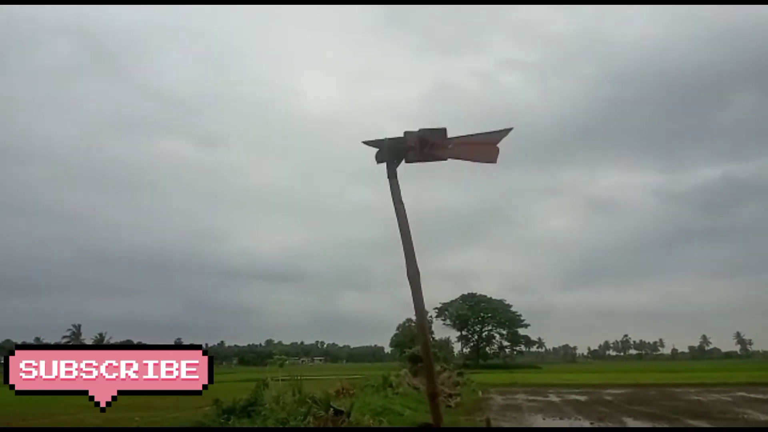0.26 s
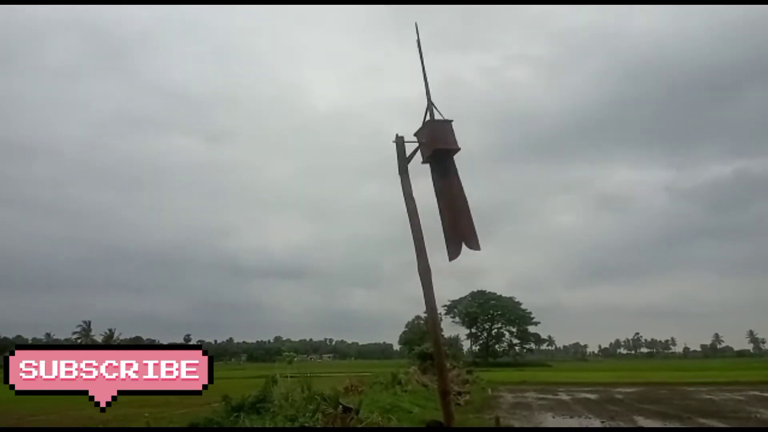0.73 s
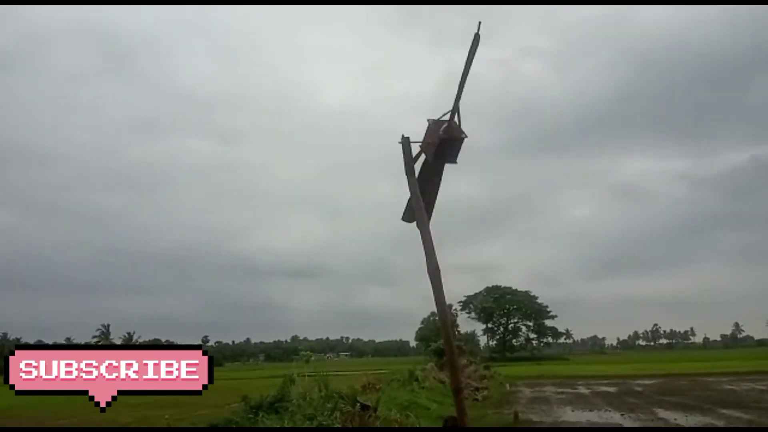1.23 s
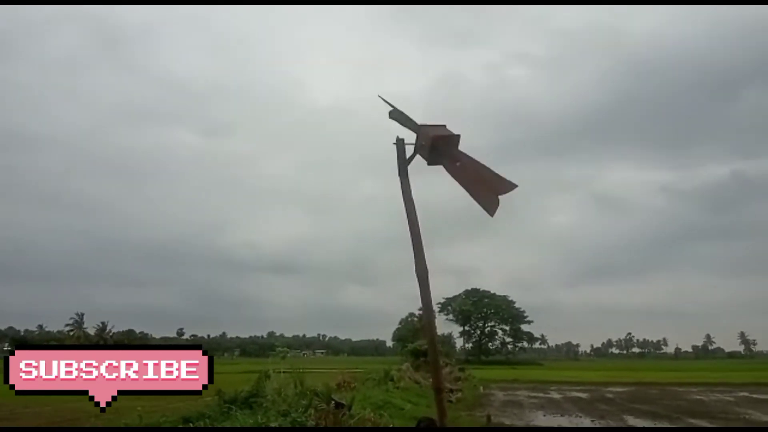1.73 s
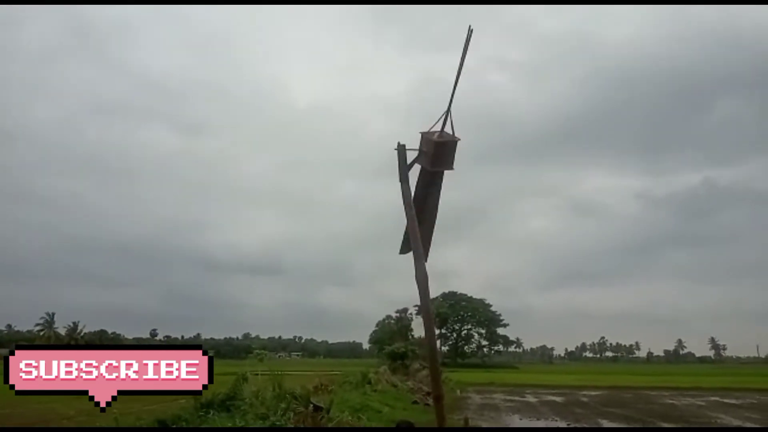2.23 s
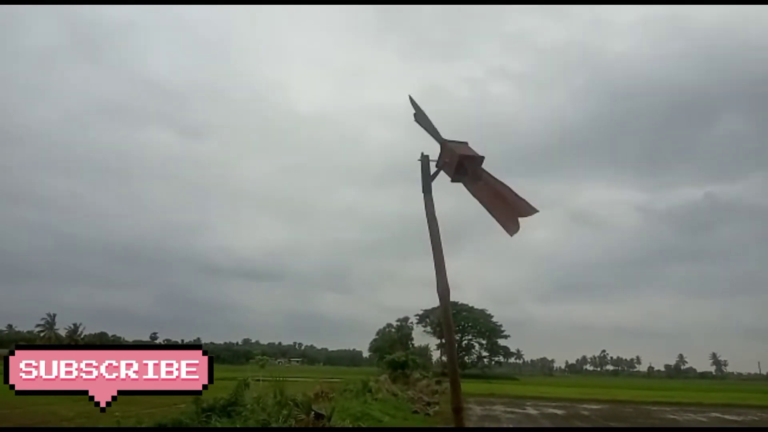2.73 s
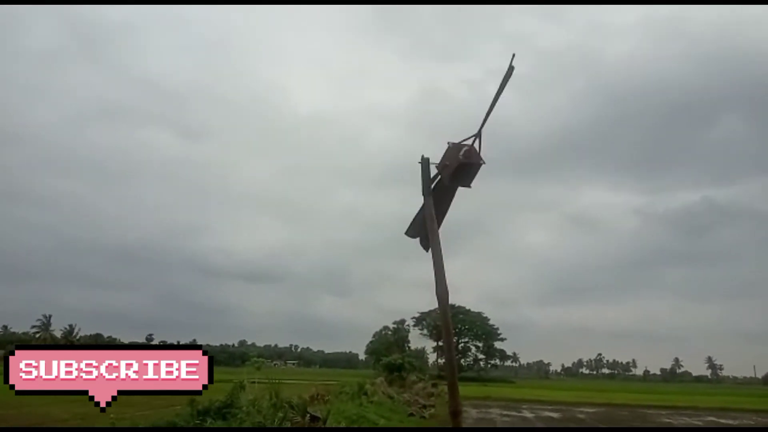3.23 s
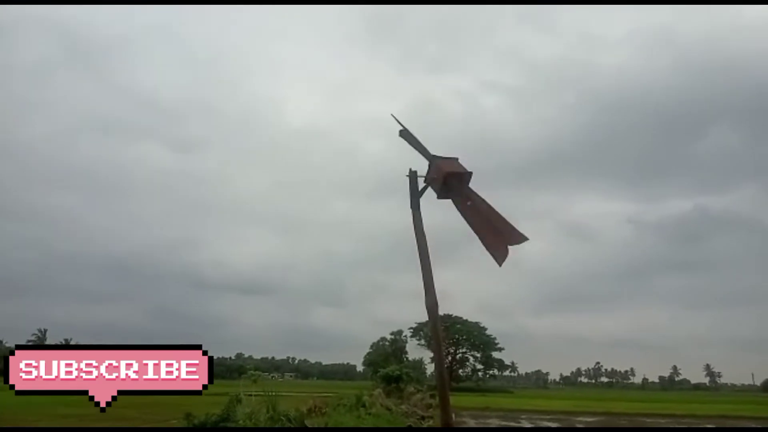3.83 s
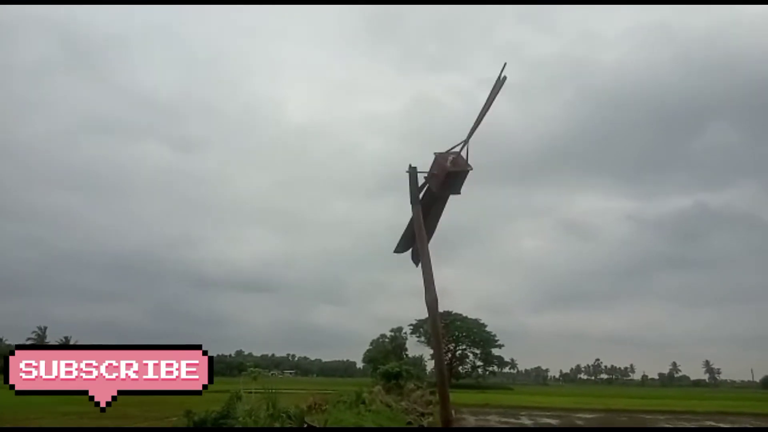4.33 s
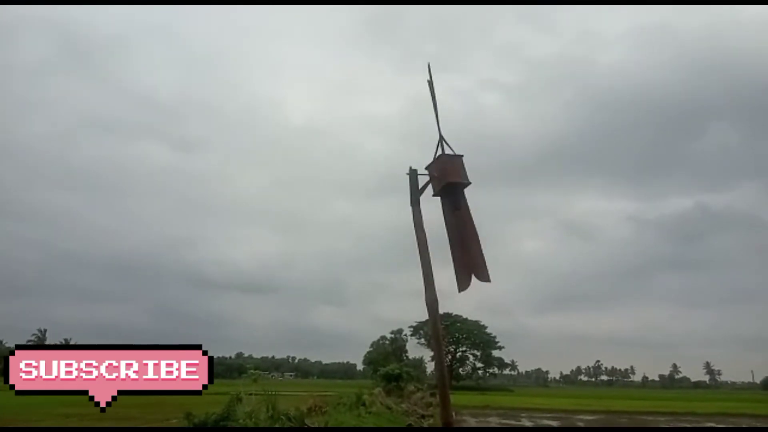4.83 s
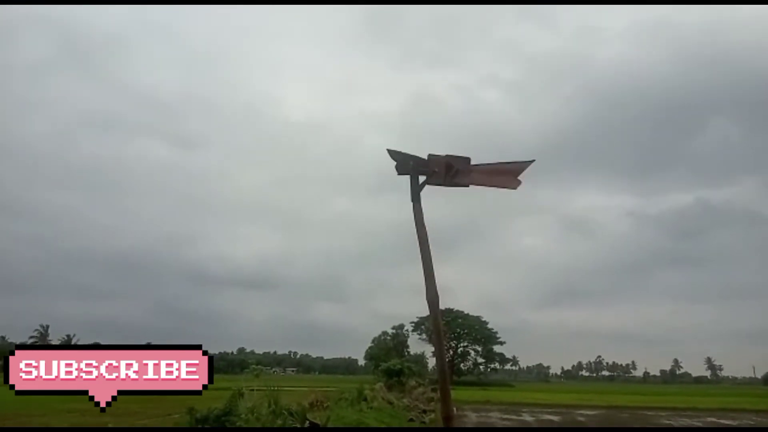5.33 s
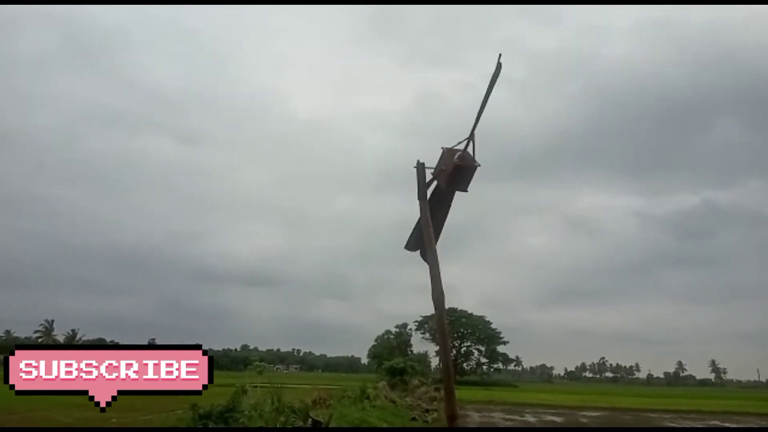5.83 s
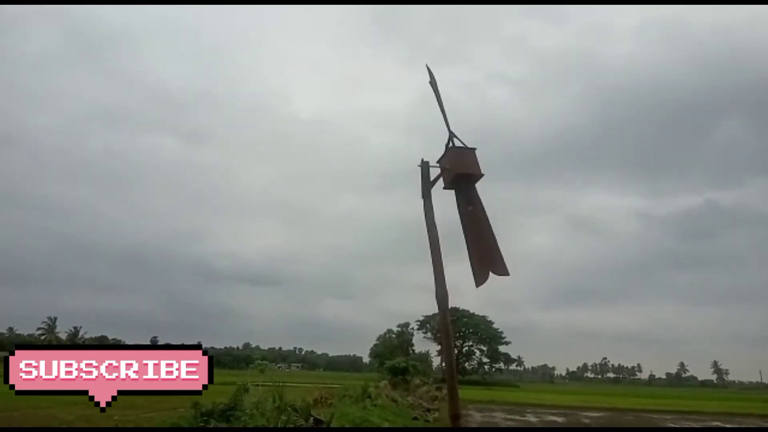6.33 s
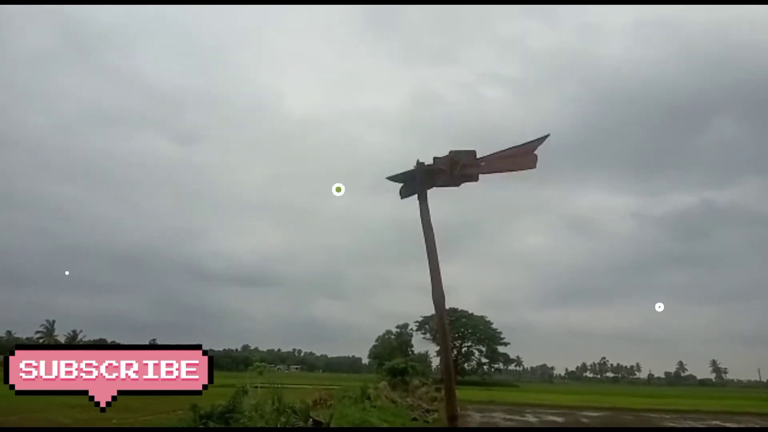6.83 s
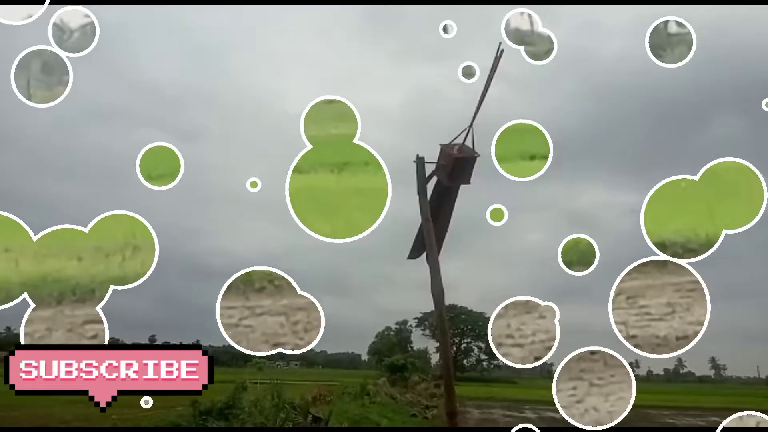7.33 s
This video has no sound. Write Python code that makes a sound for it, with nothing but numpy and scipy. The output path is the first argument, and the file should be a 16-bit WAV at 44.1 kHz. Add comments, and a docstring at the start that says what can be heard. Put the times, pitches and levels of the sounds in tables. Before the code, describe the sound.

A sheet-metal pinwheel rattles and clatters in uneven surges as it spins, with faint wind on the microphone.

```python
"""A sheet-metal pinwheel spins on a pole over an open field, its loose hub clattering on the axle.
Each swing of the blades brings a surge of small contacts and a few hard clacks, heard as bright
treble, the clang of the blades and the hollow knock of the hub box. The dry axle squeaks faintly,
wind buffets the microphone and a bush cricket trills in the grass with strokes of its wings."""
import sys
import numpy as np
from scipy import signal
from scipy.fft import rfft, irfft, next_fast_len
from scipy.io import wavfile
from scipy.ndimage import uniform_filter1d, map_coordinates

SR = 44100
rng = np.random.default_rng(int(sys.argv[2]) if len(sys.argv) > 2 else 0)


def transcribe(signal):
    """Save signal, clipped to [-1, 1], as a 16-bit WAV file at the path in sys.argv[1]."""
    frames = np.atleast_2d(signal).T
    limited = np.clip(frames, -1, 1)
    pcm = np.round(limited * 32767).astype(np.int16)
    wavfile.write(sys.argv[1], SR, pcm)


N = 333837
TIME_S = np.arange(N) / SR
RING_S = np.arange(int(SR * .2)) / SR  # time since a blow


def chatter(contacts_per_s=430, spread_db=4.5, trims_db=(-0.73, -1, -1.5), firm_db=-45, variants=44):
    """Small contacts wander over the loose hub, rattling the metal in surges as the blades swing."""
    blows = strikes(variants, dense_db=4, clink_db=4.5, buzz_db=-1, snap_t60_s=0.12)
    rattle = np.zeros(N + len(RING_S))
    for at in np.flatnonzero(rng.random(N) < contacts_per_s / SR):
        force = amp(spread_db * np.clip(rng.standard_normal(), -2, 2))
        rattle[at:at + len(RING_S)] += force * blows[rng.integers(variants)]
    levels_db = swings()
    out = np.zeros(N)
    for part, level_db, trim_db in zip(registers(rattle[:N]), levels_db, trims_db):
        # flatten each register, then let the swings ride its level
        power = uniform_filter1d(uniform_filter1d(part ** 2, size=900), size=900)
        out += part / np.sqrt(np.abs(power) + 1e-12) * amp(level_db + trim_db)
    # the rattle sounds duller when it is quiet, losing the top of the treble
    top = filtered(out, lambda hz: 1 - 1 / (1 + (hz / 8500) ** 10))
    top_gain = amp(0.74 * np.minimum(levels_db[0] - firm_db, 0))
    return out - top * (1 - top_gain)


# Hard hits of the hub, with each register's attack before its trim: start_s, treble_db, clang_db, box_db
CLACKS = [(0.0178, -25.5, -35, -50), (0.033, -26.5, -27, -59), (0.059, -27, -31, -62),
          (0.101, -21, -37.5, -54), (0.2, -19, -35, -45.5), (0.2768, -23, -41, -59), (0.314, -17, -42, -43),
          (0.404, -21, -47, -49), (0.443, -30, -50, -59), (0.489, -22, -57, -51), (0.517, -31, -54, -60),
          (0.611, -29, -41, -59), (0.6253, -23.5, -43, -46), (0.647, -23.5, -26, -48),
          (0.665, -32, -29, -43), (0.724, -22, -27, -56), (0.739, -25.5, -25.5, -44),
          (0.846, -27, -39, -69), (0.8598, -19, -24.5, -36.5), (0.904, -20.5, -31, -43),
          (0.983, -29, -40, -42.5), (1.0252, -22, -37, -54), (1.143, -26.5, -47, -44),
          (1.218, -25.5, -43, -38.5), (1.3712, -20, -51, -40), (1.4323, -25, -39, -41.5),
          (1.457, -21, -37, -55), (1.6828, -24.5, -33, -80), (1.7459, -20.5, -33, -39),
          (1.7738, -27, -28.5, -49), (1.832, -18, -37, -62), (1.8632, -19, -52, -54),
          (2.076, -30.5, -44.5, -72), (2.1572, -28.5, -43.5, -66), (2.2134, -30, -49, -72),
          (2.3563, -24, -36, -42), (2.3635, -19, -23, -58), (2.3941, -19.5, -26.5, -61),
          (2.4785, -51, -39, -55), (2.5286, -28.5, -33.5, -50), (2.657, -31, -35, -85),
          (2.7235, -24, -32, -84), (2.787, -24, -31.5, -65), (2.8832, -23, -34, -45),
          (2.9343, -17.5, -47, -57), (2.987, -27.5, -58, -62), (3.0621, -30.5, -40, -45),
          (3.0964, -25.5, -45, -63), (3.25, -32, -48, -51.5), (3.2995, -33, -48.5, -40),
          (3.361, -27, -47, -38.5), (3.418, -32, -27, -39), (3.44, -24, -46, -46),
          (3.4569, -18.5, -27.5, -56), (3.556, -29.5, -35, -62), (3.5933, -27, -31, -52),
          (3.6651, -28, -32.5, -67), (3.7161, -33, -35, -66), (3.789, -36, -42, -68),
          (3.8105, -25.5, -32, -57), (3.8638, -24.5, -42, -73), (4.0018, -17, -41, -46),
          (4.2153, -33.5, -51, -63), (4.298, -24, -44.5, -68), (4.3935, -35, -41, -59),
          (4.426, -23, -35, -49), (4.5204, -22.5, -47, -57), (4.5504, -21.5, -31.5, -51),
          (4.845, -37, -50, -78), (5.018, -34, -58, -77), (5.1032, -31.5, -46, -89), (5.14, -31, -42, -87),
          (5.1935, -19.5, -41, -72), (5.221, -22.5, -39, -52), (5.666, -44.5, -87, -92),
          (5.7944, -37, -46, -63), (5.8404, -33, -41, -39.5), (5.9262, -23.5, -27, -46),
          (6.0139, -29, -33, -56), (6.12, -29.5, -40.5, -70), (6.168, -33, -65, -79),
          (6.403, -38, -50, -77), (6.4641, -27.5, -32.5, -70), (6.4998, -22, -31.5, -61),
          (6.5493, -25, -31.5, -71), (6.775, -45, -62, -64), (6.833, -27, -41.5, -43.5),
          (6.962, -35, -43.5, -69), (7.044, -39.5, -52, -66), (7.166, -36.5, -65, -58),
          (7.237, -30.5, -49, -53), (7.318, -34, -42, -65), (7.431, -42, -43, -65)]


def clacks(treble_trim_db=-11.5, clang_trim_db=-7.5, box_trim_db=-5, rise_s=0.00054, box_rise_s=0.005):
    """The hub drops against the axle: the sheet answers at once, the hollow box swells after it."""
    blows = strikes(len(CLACKS), dense_db=1, clink_db=3.5, buzz_db=1.5, snap_t60_s=.105,
                    tick_db=-12, tick_t60_s=.035)
    attack_rms = lambda x: np.std(x[:SR // 70])
    fade_in = lambda s: 1 - np.exp(-RING_S / s)
    out = np.zeros(N + len(RING_S))
    for (start_s, treble_db, clang_db, box_db), treble, clang, box in zip(CLACKS, *registers(blows)):
        hit = amp(treble_db + treble_trim_db) * treble / attack_rms(treble)
        hit += amp(clang_db + clang_trim_db) * clang / attack_rms(clang)
        hit += amp(box_db + box_trim_db) * box / attack_rms(box) * fade_in(box_rise_s)
        out[round(start_s * SR):][:len(hit)] += hit * fade_in(rise_s)
    return out[:N]


# Lulls where the hub rests on the axle: middle_s, length_s, dip_db
RESTS = [(3.218, 0.038, -3.5), (4.986, 0.046, -8), (5.705, 0.13, -10.5), (6.343, 0.077, -18)]
# One surge of rattle per swing of the blades, with clang and box offset from the treble:
# middle_s, hold_s, treble_db, build_db_per_s, fade_db_per_s, clang_offset_db, box_offset_db, accent_hz
SURGES = [(0.083, 0.066, -35, 6, 26, -3.5, -11.5, 1135), (0.358, 0.029, -35, 16, 78, -8, -14.5, 1460),
          (0.683, 0.096, -37, 125, 56, -3, -14, 1700), (1.034, 0.057, -33.5, 78, 80, -5.5, -14.5, 1340),
          (1.473, 0.033, -33, 76, 127, -2.5, -19.5, 1120),
          (1.872, 0.074, -31.5, 96, 141, -8.5, -13.5, 1430), (2.25, 0.063, -42.5, 38, 33, -6, -12, 1560),
          (2.369, 0.043, -38, 125, 51, -2.5, -20, 2060), (2.92, 0.034, -35, 61, 79, -5, -13, 1270),
          (3.464, 0.042, -33, 125, 127, -4, -17.5, 1103), (3.913, 0.16, -41.5, 69, 49, -2, -23, 1180),
          (4.015, 0.034, -31, 904, 95, -9, -16, 1410), (4.582, 0.021, -34, 83, 104, -3.5, -25, 1600),
          (5.247, 0.053, -30, 164, 174, -5, -12, 1063), (5.55, 0.078, -63, 25, 35, -6.5, -27, 1580),
          (5.976, 0.077, -35.5, 116, 82.5, -2.5, -12.5, 1074), (6.63, 0.047, -32, 108, 75, -7, -17, 2580),
          (7.348, 0.19, -47.5, 58, 115, -4, -14.5, 1280)]


def swings(box_lag_s=0.028, flight_s=0.017, flight_db=-3.5, stutter_db=1.63):
    """Treble, clang and box envelopes in dB: each swing's rattle builds, holds and dies away."""
    treble, clang, box = np.full((3, N), -120.)
    for middle_s, hold_s, treble_db, build, fade, clang_offset_db, box_offset_db, _ in SURGES:
        since_s = TIME_S - middle_s
        ramps = lambda t, up, down: np.minimum(up * (t + hold_s / 2), down * (hold_s / 2 - t)).clip(max=0)
        surge_db = treble_db + ramps(since_s, build, fade)
        treble = np.maximum(treble, surge_db)
        clang = np.maximum(clang, surge_db + clang_offset_db)
        box_shape_db = ramps(since_s - box_lag_s, 2.35 * build, 1.49 * fade)  # later and steeper
        box = np.maximum(box, treble_db + box_offset_db + box_shape_db)
    # the hub falls free just before each clack and chatters less
    drops_s = np.append(np.sort(np.transpose(CLACKS)[0]), np.inf)
    falling = np.exp((TIME_S - drops_s[np.searchsorted(drops_s, TIME_S)]) / flight_s)
    resting_db = sum(dip_db * swell(middle_s, length_s) for middle_s, length_s, dip_db in RESTS)
    return np.array([treble, clang, box]) + flight_db * falling + resting_db + stutter_db * wobble(23)


def blade_accent(x, boost_db=5, bandwidth_ratio=0.041):
    """Each swing rests the hub on another spot, and one blade resonance rings out above the rest."""
    middles_s, *_, accents_hz = np.transpose(SURGES)
    out = x.copy()
    for hz in np.unique(accents_hz):
        presence = np.interp(TIME_S, middles_s, accents_hz == hz)
        resonance = signal.lfilter(*signal.iirpeak(hz, 1 / bandwidth_ratio, SR), x)
        out += (amp(boost_db) - 1) * presence * resonance
    return out


# Strongest ringing modes of the hub box and blades: pitch_hz, level_db
METAL_MODES = [(426, -2.5), (455, -3.5), (572, -1.5), (612, -5), (690, -8), (1011, 2.5), (1080, 6),
               (1120, 3), (1330, -2), (1459, -1), (1587, 1), (1791, 0), (1947, 3), (2080, 1), (2712, -1),
               (3992, -1), (4994, -2), (6450, 1), (7154, 1)]
# Tone colour of the struck sheet: frequency_hz, level_db
SHEET_EQ = [(250, -7.5), (750, 1), (1030, 1.5), (1550, 5), (2080, 7), (2650, -5), (2900, -8.5), (3150, -6),
            (3900, -1.5), (5000, -1.5), (5500, -6.5), (6500, 0.5), (7300, -3.5), (8200, -8.5), (15500, -23)]


def strikes(count, dense_db, clink_db, buzz_db, snap_t60_s, tick_db=-16, tick_t60_s=0.028):
    """A bank of blows on the metal; where each one lands decides which modes it wakes."""
    decay = lambda t60_s: amp(-60 * RING_S / t60_s)
    ring_t60_s = lambda hz: 0.19 * (hz / 1000) ** -.25
    sheet = lambda hz: eq_gain(SHEET_EQ, hz)
    burst = lambda tone, t60_s: filtered(rng.standard_normal((count, len(RING_S))), tone) * decay(t60_s)

    def partials(hz, t60_s):
        phase = rng.uniform(0, 2 * np.pi, (len(hz), 1))
        return np.sin(2 * np.pi * hz[:, None] * RING_S + phase) * decay(t60_s[:, None])

    mode_hz, mode_db = np.transpose(METAL_MODES)
    ring, clink = [], []
    # the blades flex as they turn, so their modes shift a little from blow to blow
    for scatter_db in rng.uniform(-6, 6, (count, len(mode_hz))):
        detuned_hz = mode_hz * (1 + 0.0032 * rng.standard_normal(len(mode_hz)))
        ring.append(amp(mode_db + scatter_db) @ partials(detuned_hz, ring_t60_s(mode_hz)))
    # a dense wash of finer modes fills the gaps
    fine_hz = np.linspace(np.sqrt(800), np.sqrt(15500), 380) ** 2 + rng.uniform(-15, 15, 380)
    fine_gains = rng.standard_normal((count, len(fine_hz))) * sheet(fine_hz) * fine_hz ** .25
    dense = fine_gains @ partials(fine_hz, ring_t60_s(fine_hz))
    # quickly damped modes near the contact give each blow its own clink
    for near_hz in np.geomspace(950, 7400, 15) * rng.uniform(.9, 1.1, (count, 15)):
        near_gains = sheet(near_hz) * np.sqrt(near_hz) * rng.uniform(0.14, 1, len(near_hz))
        clink.append(near_gains @ partials(near_hz, snap_t60_s * np.sqrt(2500 / near_hz)))
    # the thin sheet buzzes for a moment and its bare edge ticks
    buzz = burst(sheet, snap_t60_s)
    tick = burst(lambda hz: eq_gain([(3000, -20), (7500, 0), (15500, -9)], hz), tick_t60_s)
    blows = unit(ring) + amp(dense_db) * unit(dense) + amp(clink_db) * unit(clink)
    blows += amp(buzz_db) * unit(buzz) + amp(tick_db) * unit(tick)
    # every blow gets its own random EQ
    bands_hz = np.geomspace(700, 15000, 14)
    tints_db = 3 * rng.standard_normal((count, len(bands_hz)))
    tint = lambda hz: np.array([eq_gain(np.c_[bands_hz, row], hz) for row in tints_db])
    return np.array([unit(blow) for blow in filtered(blows, tint)])


def registers(x):
    """Split the metal into treble, clang and box; the small box radiates no deep bass."""
    below = lambda edge_hz: filtered(x, lambda hz: 1 / (1 + (hz / edge_hz) ** 12))
    bass, lows, lows_and_mids = below(250), below(830), below(2500)
    return x - lows_and_mids, lows_and_mids - lows, lows - bass


def flexing(x, depth_db=5.0):
    """The twisting blades let now one mode ring out, now another."""
    hz, _, spectrum = signal.stft(x, SR, nperseg=1024)
    patches = uniform_filter1d(rng.standard_normal(spectrum.shape), size=3, axis=0)
    patches = unit(uniform_filter1d(patches, size=8))
    band_depth_db = depth_db / (1 + (hz[:, None] / 5500) ** 2)
    gain = amp(band_depth_db * np.clip(patches, -2, 2))
    gain /= np.sqrt(np.mean(gain ** 2, axis=1, keepdims=True))
    return signal.istft(spectrum * gain, SR, nperseg=1024)[1][:N]


# Squeaks of the dry axle: middle_s, length_s, pitch_hz, level_db, waver_ratio
SQUEAKS = [(3.645, 0.05, 4550, -55, 0.002), (6.3, 0.15, 4540, -61, 0.002), (4.47, 0.36, 600, -65, 0.07),
           (4.73, 0.17, 664, -63, 0.037), (4.985, 0.08, 4000, -64, 0.02), (6.403, 0.075, 780, -67, 0.036)]


def squeaks(roughness_db=3):
    """The dry axle sticks and slips as the blades slow: a thin whistle or a scratchy groan."""
    out = np.zeros(N)
    for middle_s, length_s, pitch_hz, level_db, waver_ratio in SQUEAKS:
        note = sine(pitch_hz * (1 + waver_ratio * wobble(620)))
        grip = amp(roughness_db * wobble(110))
        out += amp(level_db) * swell(middle_s, length_s) * unit(note * grip)
    return out


# The breeze comes up, drops twice and returns, before its trim: time_s, level_db
BREEZE_LEVELS = [(0, -73), (0.38, -70), (0.66, -53.5), (1.4, -59), (1.8, -51), (3.3, -55), (5.1, -54),
                 (5.17, -74), (5.42, -59.5), (5.78, -84), (5.87, -54.5), (7.57, -52.5)]
# Low rumble of the buffeting: frequency_hz, level_db
BUFFET_EQ = [(20, -27), (45, -17.5), (88, 3), (115, 0.5), (160, -11), (260, -30), (900, -79)]
# Gusts that thump the microphone: middle_s, length_s, level_db
THUMPS = [(2.17, 0.26, -56), (2.534, 0.061, -51.5), (6.14, 0.035, -50), (6.359, 0.092, -48),
          (7.316, 0.19, -56.5)]


def wind(breeze_trim_db=-1):
    """Eddies puff at the microphone, with a few broader thumps."""
    puffs = amp(7 * np.tanh(1.3 * wobble(24)))
    buffet = fader(BREEZE_LEVELS) * amp(breeze_trim_db) * unit(noise(BUFFET_EQ) * puffs)
    thump = noise([(30, -32), (90, 1), (200, -3), (330, -14), (600, -63)])
    gusts = sum(amp(level_db) * swell(middle_s, length_s) for middle_s, length_s, level_db in THUMPS)
    return buffet + thump * gusts


# The trill swells and recedes: time_s, level_db
CRICKET_LEVELS = [(0, -78), (4.9, -64), (5.6, -70.5), (7.5, -77)]


def cricket(pitch_hz=9430, sweep_hz=900, strokes_per_s=138, phrases_per_s=10.3):
    """A bush cricket: every wing stroke is a falling chirp, grouped in phrases."""
    stroke_phase = np.cumsum(strokes_per_s * (1 + 0.024 * wobble(37))) / SR % 1
    chirps = sine(pitch_hz + sweep_hz * (.5 - stroke_phase) + 90 * wobble(440))
    phrasing = .5 + np.abs(np.sin(np.pi * phrases_per_s * TIME_S))
    return fader(CRICKET_LEVELS) * unit(chirps * np.sin(np.pi * stroke_phase) * phrasing)


# Soft hiss of still air: frequency_hz, level_db
AIR_EQ = [(30, -18), (4000, 6), (15000, -47)]


def open_air(level_db=-77):
    """A faint, steady bed of air over the field."""
    return amp(level_db) * noise(AIR_EQ)


def amp(db):
    """Decibels to gain."""
    return 10 ** (np.asarray(db) / 20)


def unit(x):
    """Scale to rms 1."""
    return np.asarray(x) / np.sqrt(np.mean(np.square(x)) + 1e-20)


def eq_gain(points, hz):
    """Gain at hz of (frequency_hz, level_db) points joined on a log axis."""
    points_hz, points_db = np.transpose(points)
    return amp(np.interp(np.log(hz + 1), np.log(points_hz), points_db))


def fader(points):
    """Gain per sample through (time_s, level_db) points."""
    return amp(np.interp(TIME_S, *np.transpose(points)))


def wobble(knots_per_s):
    """A smooth random curve."""
    knots = rng.standard_normal(int(N * knots_per_s / SR) + 4)
    return map_coordinates(knots, [TIME_S * knots_per_s])


def swell(middle_s, length_s):
    """A rounded bump of height 1."""
    return np.exp(-np.minimum((2 * (TIME_S - middle_s) / length_s) ** 4, 50))


def sine(hz):
    """A tone that follows a pitch curve."""
    return np.sin(2 * np.pi * np.cumsum(hz) / SR)


def filtered(x, response):
    """Shape x with a gain given as a function of frequency."""
    length = x.shape[-1]
    padded = next_fast_len(length + 8192)
    return irfft(rfft(x, padded) * response(np.fft.rfftfreq(padded, 1 / SR)), padded)[..., :length]


def noise(eq):
    """Coloured noise of rms 1."""
    return unit(filtered(rng.standard_normal(N), lambda hz: eq_gain(eq, hz)))


def scene():
    """The pinwheel up front, wind, cricket and air behind: mono, with no walls to answer."""
    pinwheel = blade_accent(flexing(chatter()) + clacks()) + squeaks()
    return (pinwheel + wind() + cricket() + open_air())[None]


def record(dry):
    """A brick-wall low-pass takes off the very top."""
    return filtered(dry, lambda hz: hz < 15800)


dry = scene()
out = record(dry)
transcribe(out)
```